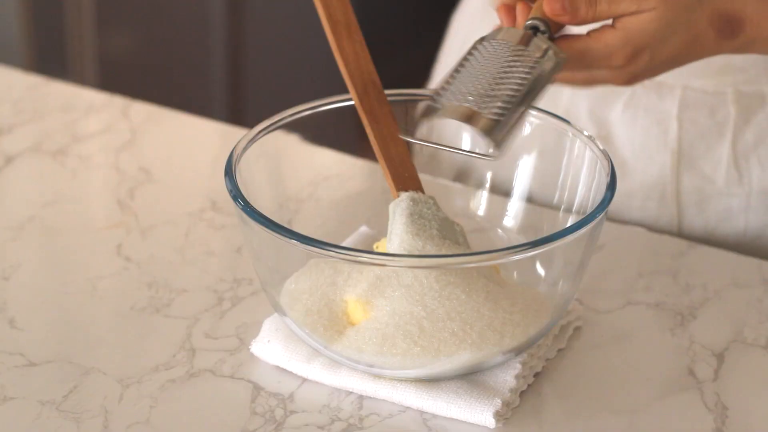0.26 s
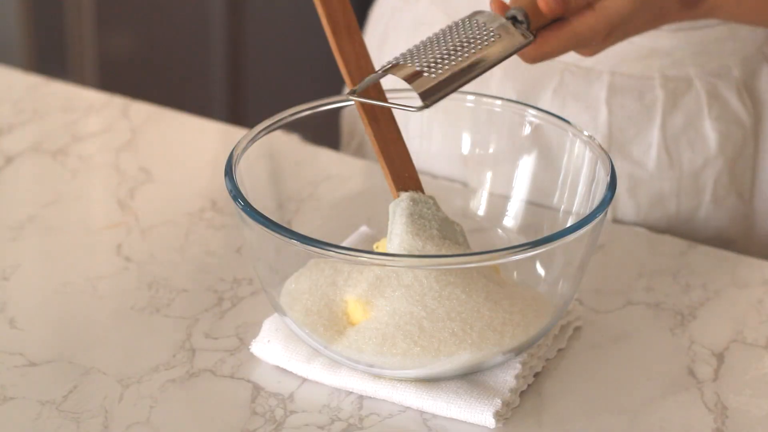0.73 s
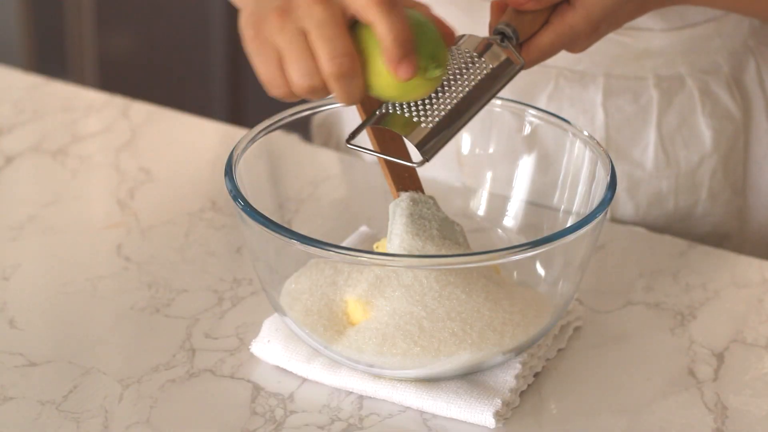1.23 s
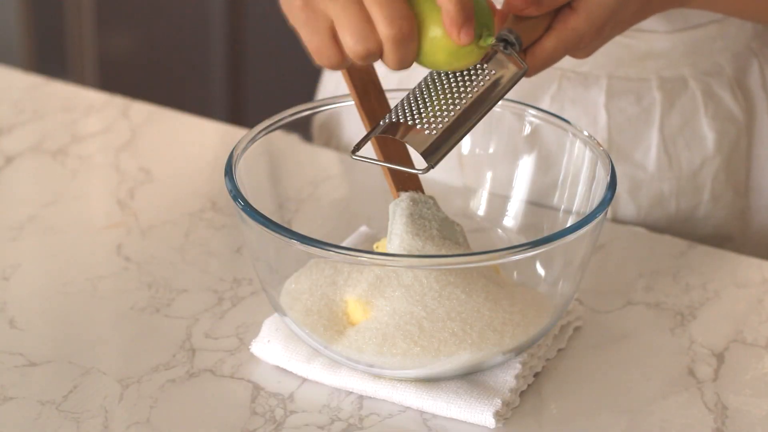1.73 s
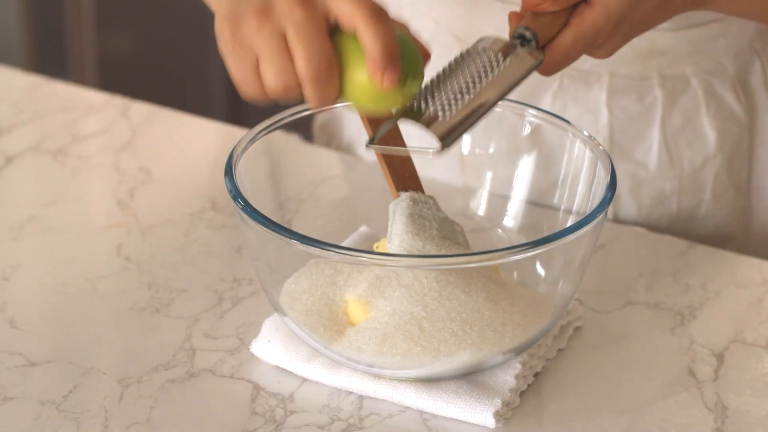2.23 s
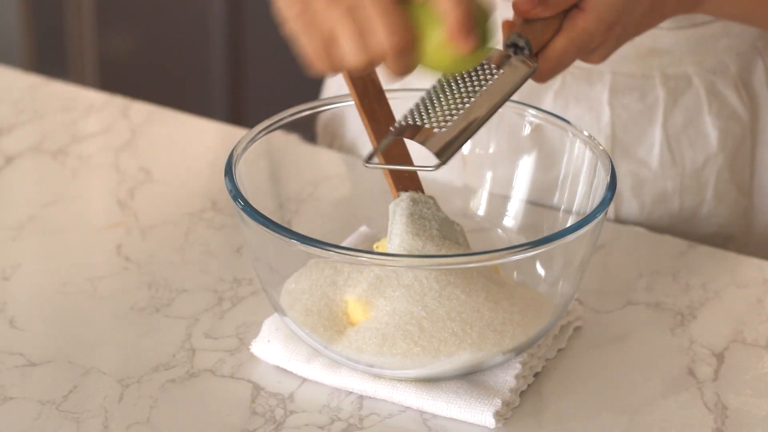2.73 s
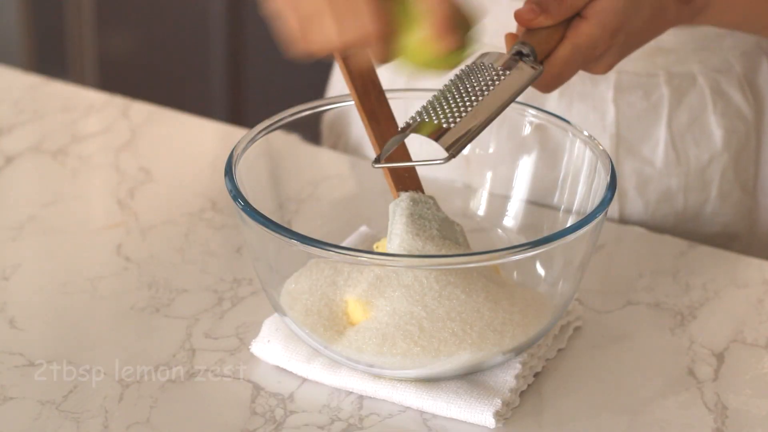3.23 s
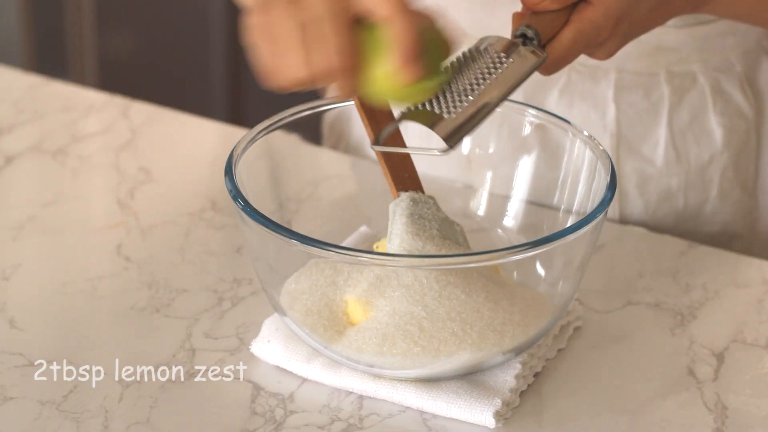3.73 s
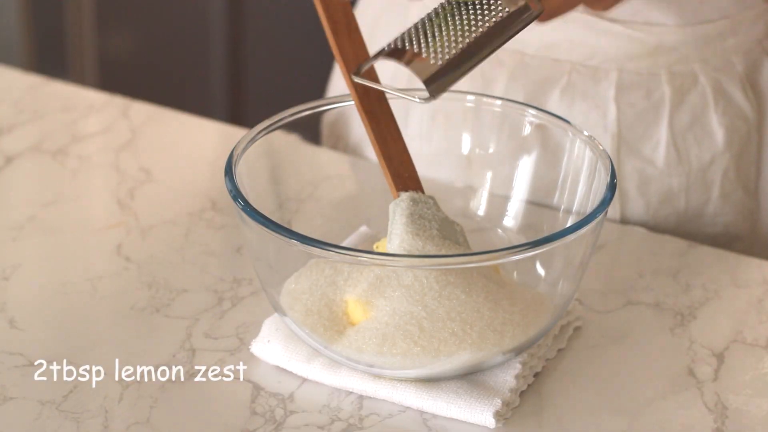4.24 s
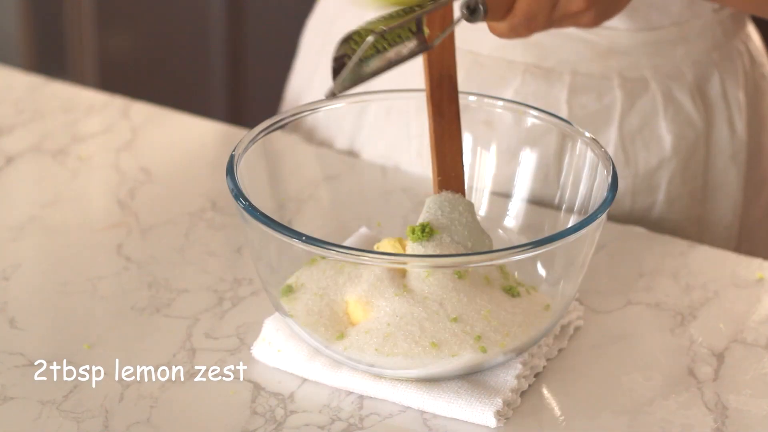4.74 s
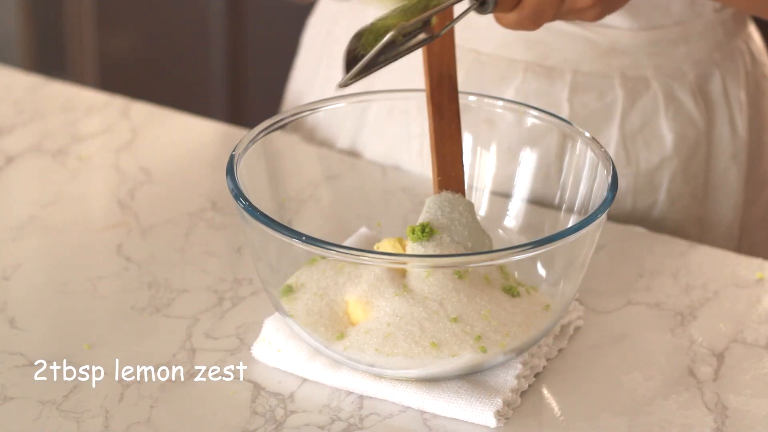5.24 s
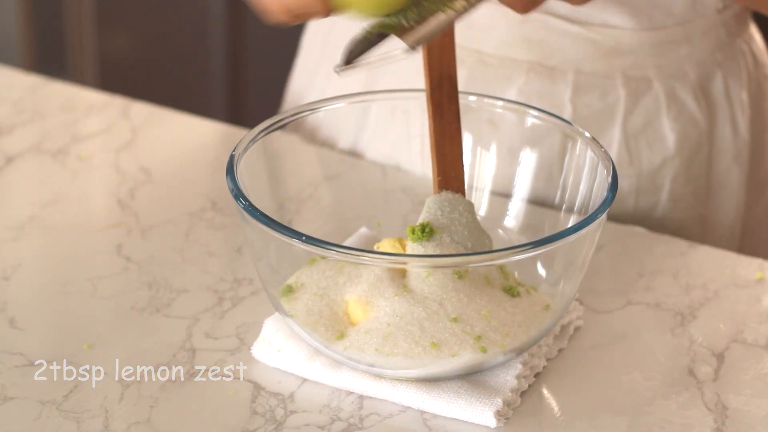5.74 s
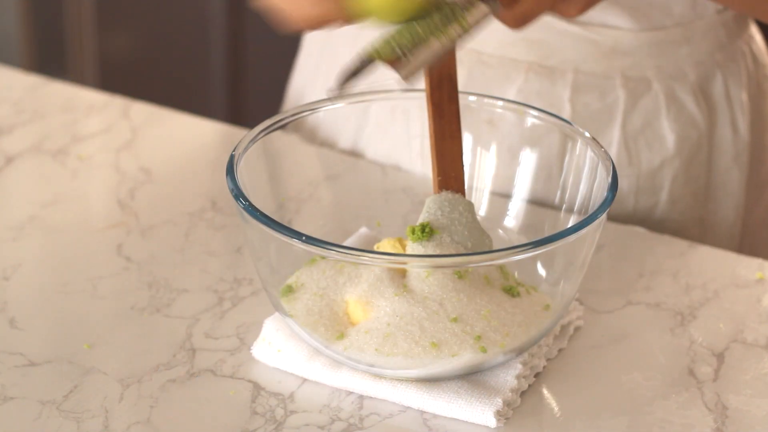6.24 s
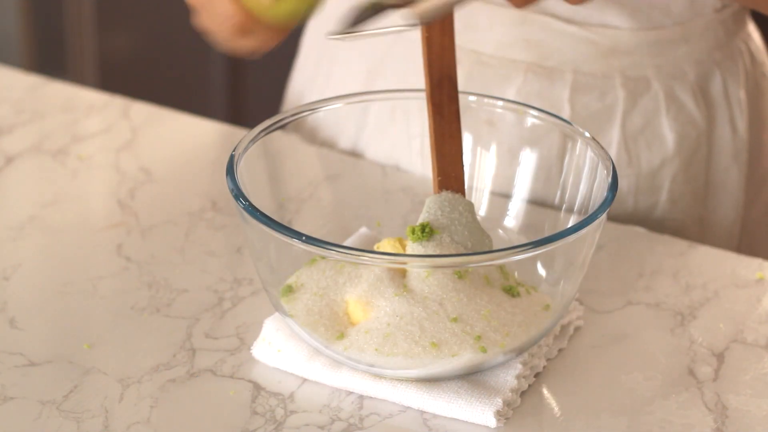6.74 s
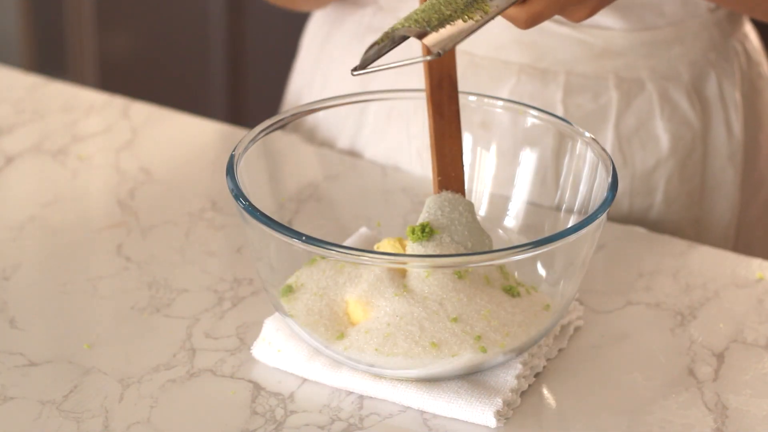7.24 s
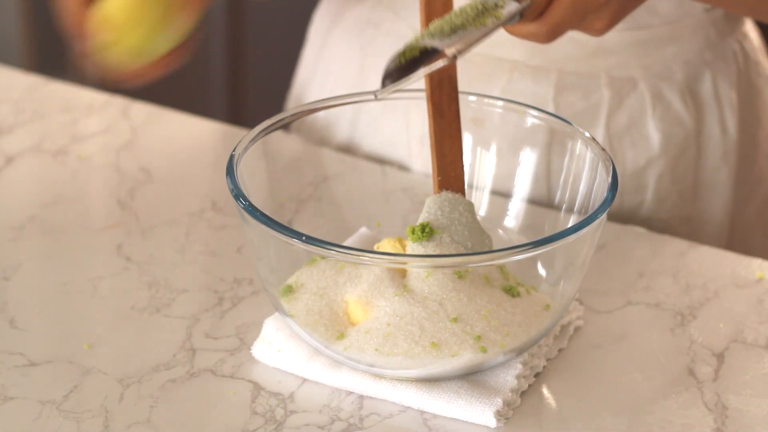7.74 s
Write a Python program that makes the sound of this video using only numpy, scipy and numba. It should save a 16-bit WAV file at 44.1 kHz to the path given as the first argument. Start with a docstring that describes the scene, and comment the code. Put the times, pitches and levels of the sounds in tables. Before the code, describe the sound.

Citrus peel rasps on a small steel hand grater, first in separate strokes with light taps, then in fast back-and-forth rubbing, over faint kitchen hum.

```python
"""In a small kitchen with a faint hum, a lemon is zested on a fine hand grater over a glass bowl.
Single downstrokes, the later ones each after a light tap of the fruit on the steel, give way to
quick back-and-forth rubbing heard from another angle. Teeth snapping through the peel are random clicks;
they hiss directly and set off gliding resonances of the steel sheet and the hollow grater.
Brushing, clinks, a small room, a slightly widened treble and kitchen air with hum complete the sound."""
import sys
import numpy as np
from scipy import signal
from scipy.fft import rfft, irfft, next_fast_len
from scipy.io import wavfile
from numba import njit

SR = 44100
rng = np.random.default_rng(int(sys.argv[2]) if len(sys.argv) > 2 else 0)


def transcribe(u):
    """Save the signal u as a 16-bit wav file named by the first command-line argument.

    u: samples, shape (n,) or (channels, n), limited to [-1, 1]; the rate is SR.
    q: integer samples, one column per channel.
    """
    v = np.clip(np.atleast_2d(u).T, -1, 1)
    q = np.round(v * 32767).astype(np.int16)
    wavfile.write(sys.argv[1], SR, q)


N = 351918
TIME = np.arange(N) / SR
PUSH, PULL = 1, -1  # stroke directions
TURN_S = 4.66  # when the listening angle changes

# colour of the tearing peel in quick rubbing: (frequency [Hz], relative level per hertz [dB])
QUICK_RASP = [(1000, -57), (2700, -5), (3400, -0.5), (4000, -0.5), (4700, 0), (5500, -1.5), (6300, 1),
              (7300, 2.5), (8800, -8.5), (10500, 1.5), (12000, -1), (13500, -2), (15500, -9)]


def single_strokes():
    """Separate downstrokes: each press drives the teeth through the peel once."""
    # the strokes; bite is how much harder than usual the teeth shake the steel:
    # (start [s], length [s], rasp level [dB], bite [dB])
    strokes = [(1.234, 0.14, -25, -13), (1.392, .15, -33.5, -6), (1.565, 0.13, -28, -7.5),
               (1.702, 0.17, -33, -6), (1.865, 0.16, -25, 0.5), (2.202, 0.15, -22, -1),
               (2.519, .146, -22.5, 1.5), (2.827, 0.14, -22, -1.5), (3.13, 0.14, -20, 3),
               (3.414, 0.15, -22.5, 3), (3.75, 0.16, -18, 2), (4.051, 0.15, -19.5, -0.5),
               (4.46, 0.13, -17, -5)]
    # colour of the tearing peel: (frequency [Hz], relative level per hertz [dB])
    rasp = [(1000, -35.5), (2900, -21.5), (3600, -13.5), (4700, -1.5), (5500, -0.5), (6300, -0.5),
            (7300, -4), (8800, -5), (10500, -5.5), (12000, -0.5), (13500, -5), (15500, -6)]
    # resonances of the steel sheet: (frequency [Hz], width [Hz], relative level [dB])
    sheet = [(1110, 35, -2.5), (1600, 50, -1), (1900, 100, 0), (2250, 200, -3.5), (3155, 220, 2),
             (3567, 570, -3)]
    # low resonances of the curved grater under the fruit: (frequency [Hz], width [Hz], relative level [dB])
    body = [(280, 88, -10), (399, 88, -3.5), (483, 98, 0.5), (650, 166, 4), (771, 253, -4.5)]
    downstrokes = [(*row, PUSH) for row in strokes]
    motion = stroking(downstrokes, rise=0.42, fall=0.49)
    force = tears(per_s=24000, spread_db=2.5, judder_db=1.14)
    return grating(motion, force, rasp, sheet, body, sheet_db=-13, body_db=-12.5, sheet_follows=0.78,
                   sheet_power=1.0, body_power=1.37, sag_octaves=0.12, flex_octaves=0)


def quick_strokes():
    """Rubbing to and fro flexes the sheet: its ring is higher on the push and lower on the pull."""
    # the strokes: (start [s], length [s], rasp level [dB], bite [dB], direction [push 1, pull -1])
    strokes = [(4.68, 0.12, -19, 2.5, PUSH), (4.803, 0.087, -20, 2.5, PULL), (4.918, 0.1, -21.5, 2.5, PUSH),
               (5.032, .105, -22, 1, PULL), (5.169, 0.094, -23.5, 1, PUSH),
               (5.326, 0.093, -23.5, 0.5, PULL), (5.471, 0.12, -20, -4, PUSH),
               (5.588, 0.12, -24, 1.5, PUSH), (5.708, .112, -21.5, 2.5, PULL),
               (5.824, 0.11, -25.5, 5, PUSH), (5.948, 0.11, -21.5, 0, PULL), (6.058, 0.11, -21.5, 0, PUSH),
               (6.176, 0.11, -21.5, -1, PULL), (6.29, 0.11, -21, -0.5, PUSH),
               (6.414, 0.11, -22.5, 0.5, PULL), (6.543, .117, -24, -1.5, PUSH),
               (6.661, 0.13, -23.5, -0.5, PULL)]
    # resonances of the steel sheet: (frequency [Hz], width [Hz], relative level [dB])
    sheet = [(990, 285, -9.5), (1568, 260, -2.5), (1668, 260, -1), (2430, 760, -6.5), (2705, 470, -6.5),
             (2797, 146, -3)]
    # low resonances of the curved grater under the fruit: (frequency [Hz], width [Hz], relative level [dB])
    body = [(192, 130, -16), (442.6, 120, -9), (501, 39.5, 1), (640, 68, 3), (801, 180, -5.5)]
    motion = stroking(strokes, rise=0.32, fall=0.39)
    force = tears(per_s=20000, spread_db=1.5, judder_db=1.03)
    # the rubbing starts hard and eases off, so the sheet rings less and less (1.7 dB each second)
    eased_db = 1.7 * np.maximum(TIME - TURN_S, 0)
    return grating(motion, force, QUICK_RASP, sheet, body, sheet_db=-8 - eased_db, body_db=-14.5,
                   sheet_follows=0.6, sheet_power=1.12, body_power=0.9, sag_octaves=0.062, flex_octaves=0.069)


def grating(motion, force, rasp, sheet, body, sheet_db, body_db, sheet_follows, sheet_power, body_power,
            sag_octaves, flex_octaves):
    """Tears hiss directly and shake sheet and body; a deep bite brings out the low body rings most."""
    pressure, rasp_db, bite_db, direction, travel = motion
    rasp_gain = from_db(rasp_db) * pressure
    # the powers set how sharply each ringing level follows the pressure
    sheet_gain = from_db(rasp_db + sheet_db + sheet_follows * bite_db) * pressure ** sheet_power
    body_gain = from_db(rasp_db + body_db + bite_db) * pressure ** body_power
    sheet_bend = flex_octaves * direction + 0.05 * drift(8)
    # the hollow note sags as the fruit travels along the blade
    body_bend = -sag_octaves * travel + 0.018 * drift(9.7)
    hiss = wandering(coloured(force, rasp), wander_db=1.63)
    sheet_ring = ringing(force, sheet, sheet_bend, damping_db=0.9, low_hz=830, high_hz=4000)
    body_ring = ringing(force, body, body_bend, damping_db=2.4, low_hz=175, high_hz=994)
    return rasp_gain * hiss + sheet_gain * sheet_ring + body_gain * body_ring


def stroking(strokes, rise, fall):
    """The hand's motion: pressure (0-1), rasp and bite (dB), direction, place along the blade (-.5 to .5)."""
    pressure, rasp_db, bite_db, direction, travel = np.zeros((5, N))
    for start, length, stroke_db, stroke_bite_db, way in strokes:
        # rise and fall are shares of the stroke's length
        press = swell(start, length, rise * length, fall * length)
        on = press > pressure  # where strokes overlap, the harder press wins
        pressure[on] = press[on]
        rasp_db[on], bite_db[on], direction[on] = stroke_db, stroke_bite_db, way
        travel[on] = (TIME[on] - start) / length - .5
    return pressure, rasp_db, bite_db, direction, travel


def tears(per_s, spread_db, judder_db):
    """Teeth snap through peel cells: clicks of uneven size, their strength juddering as rows of teeth bite."""
    unevenness = np.minimum(rng.exponential(1, N), 4)
    sizes = from_db(spread_db * unevenness) * rng.choice([-1, 1], N)
    happens = rng.random(N) < per_s / SR
    return rms_one(sizes * happens * from_db(judder_db * drift(260)))


def wandering(x, wander_db):
    """The contact moves over the sheet, so each part of the treble comes and goes; rms 1."""
    size = next_fast_len(N)
    spectrum, hz = rfft(x, size), np.arange(size // 2 + 1) * SR / size
    centres = np.geomspace(2500, 16000, 12)
    total = 0
    for share in np.eye(len(centres)):
        # overlapping triangular slices that add up to the whole sound
        part = irfft(spectrum * np.interp(hz, centres, share), size)[:N]
        total = total + from_db(wander_db * drift(22)) * part
    return rms_one(total)


def ringing(force, modes, bend, damping_db, low_hz, high_hz):
    """The sliding fruit bends each resonance (octaves) and damps it by a changing amount; rms 1."""
    turn_per_hz = 2 * np.pi / SR * 2 ** bend
    rings = 0
    for k, (hz, width_hz, level_db) in enumerate(modes):
        gain = (-1) ** k * from_db(level_db + damping_db * drift(14))  # neighbours have opposite signs
        rings = rings + gain * gliding(force, hz * turn_per_hz, np.exp(-np.pi * width_hz / SR))
    return rms_one(band(rings, low_hz, high_hz))


@njit
def gliding(x, turn, r):
    """A resonance whose centre (radians a sample) moves; r is what remains of its ring after one sample."""
    out, state = np.zeros(len(x)), 0j
    for i in range(1, len(x)):
        state = state * r * complex(np.cos(turn[i]), np.sin(turn[i])) + x[i]
        out[i] = 2 * (1 - r) * state.real
    return out


def quick_contact():
    """Light sliding and the odd bright snag of a tooth around the quick strokes."""
    # the fruit keeps sliding lightly on the teeth: (start [s], length [s], level [dB])
    slides = [(4.652, .62, -37.5), (5.353, 1.41, -38.5)]
    # a tooth catches and lets go: (time [s], relative level [dB])
    snags = [(4.708, -10), (4.7105, -12), (5.381, -18), (5.44, -17.5), (5.453, -35), (5.468, -15)]
    touch = sum(from_db(db) * swell(s, length, 0.012, 0.026) for s, length, db in slides)
    slide = touch * coloured(tears(per_s=2700, spread_db=5.0, judder_db=1.5), QUICK_RASP)
    return slide + band(bursts(snags, decay_s=0.0049), 5600, 17000) * from_db(3)


def taps(level_db):
    """Soft peel meets steel: a short crunch sets off heavily damped resonances."""
    # the fruit knocks on the steel: (time [s], relative level [dB])
    knocks = [(2.174, -24), (2.502, -18.5), (2.506, -26), (2.798, -21), (3.099, -21.5), (3.39, -25.5),
              (3.704, -21), (4.018, -28), (4.329, -22.5)]
    # what a knock rings with: (frequency [Hz], width [Hz], relative level [dB])
    modes = [(663, 95, 4.5), (1750, 249, -9), (2587, 440, -1), (4520, 770, -1.5), (6340, 1600, -6.5),
             (7800, 900, -10.5), (10500, 1700, -6)]
    force = bursts(knocks, decay_s=.0014)
    return from_db(level_db) * sum(from_db(db) * resonate(force, hz, width_hz) for hz, width_hz, db in modes)


def handling():
    """Fingers and fruit brush the grater as broad noise; steel clinks or squeaks in the hand as narrow noise."""
    # brushes of fingers and fruit: (start [s], length [s], centre frequency [Hz], relative level [dB])
    brushes = [(0.197, 0.33, 2200, -58.5), (0.603, 0.33, 7000, -61.5), (1.222, 0.05, 5800, -56),
               (4.383, 0.058, 6740, -34), (7.636, 0.3, 2500, -68)]
    # clinks and squeaks of the steel: (start [s], length [s], centre frequency [Hz], relative level [dB])
    clinks = [(0.573, 0.014, 5800, -52), (0.762, 0.087, 3260, -53.5), (7.912, 0.008, 4250, -50)]
    return touching(brushes, width=1) + touching(clinks, width=0.18)


def touching(touches, width):
    """Swells of noise through two equal resonances; width is a share of the centre frequency."""
    noise = rng.standard_normal(N)
    total = 0
    for s, length, hz, db in touches:
        tone = rms_one(resonate(resonate(noise, hz, width * hz), hz, width * hz))
        total = total + from_db(db) * swell(s, length, length * 0.195, length) * tone
    return total


def kitchen(x, level_db, bass_db):
    """Direct sound plus the room, whose echo pattern changes as the hands move."""
    place = 2 * drift(4)
    # the sound wanders between two different echo patterns
    wet = sum(signal.fftconvolve(x * share, room_tail(bass_db))[:N] for share in (np.cos(place), np.sin(place)))
    return x + from_db(level_db) * wet


def room_tail(bass_db):
    """Diffuse echoes that die band by band; energy 1."""
    # kitchen reverberation: (frequency [Hz], time to fall by 60 dB [s])
    room_t60 = [(300, 0.46), (1500, 0.25), (4500, 0.35), (9000, 0.23), (15000, 0.094)]
    age, tail = np.arange(SR // 2) / SR, 0
    edges = np.geomspace(150, 19200, 8)
    for low, high in zip(edges, edges[1:]):
        hz = np.sqrt(low * high)
        lift_db = bass_db / (1 + (hz / 2500) ** 2)
        decay_db = lift_db - 60 * age / at_hz(room_t60, hz)
        tail = tail + band(rng.standard_normal(len(age)), low, high) * from_db(decay_db)
    tail = tail * np.clip(age / 0.0044, 0, 1)  # the echoes build up over the first 4.4 ms
    return tail / np.linalg.norm(tail)


def two_ports(x, lag_s, scatter_db):
    """A faint bright scatter, added left and subtracted right, widens the sound; the right port lags."""
    side = from_db(scatter_db) * scattered(x, decay_s=.015, above_hz=1200)
    size = next_fast_len(N)
    delay = np.exp(-2j * np.pi * np.arange(size // 2 + 1) * SR / size * lag_s)
    right = irfft(rfft(x - side, size) * delay, size)[:N]
    return np.array([x + side, right])


def scattered(x, decay_s, above_hz):
    """A short random cluster of bright echoes that widens the treble."""
    age = np.arange(SR // 20) / SR
    echoes = rng.standard_normal(len(age)) * np.exp(-age / decay_s) * (age > .001)
    echoes = echoes / np.linalg.norm(echoes)
    echoes = signal.sosfilt(signal.butter(1, above_hz, "high", fs=SR, output="sos"), echoes)
    return signal.fftconvolve(x, echoes)[:N]


def first_background():
    """Kitchen air and appliance hum from the first angle."""
    # colour of the air: (frequency [Hz], relative level per hertz [dB])
    air = [(20, -5.5), (32, -21), (60, -17), (120, -17.5), (350, -25), (600, -31.5), (740, -26.5),
           (900, -32.5), (1090, -29), (1300, -36), (3500, -46.5), (15500, -53)]
    # appliance hum: (frequency [Hz], relative level [dB], waver [dB])
    hum = [(96.5, -56, 3), (193.7, -65.5, 8.5)]
    return background(air, -47, hum)


def second_background():
    """Kitchen air and appliance hum from the second angle."""
    # colour of the air: (frequency [Hz], relative level per hertz [dB])
    air = [(20, -9), (45, 1), (135, -0.5), (190, -6.5), (350, -7.5), (550, -14.5), (730, -12), (900, -16.5),
           (1100, -15.5), (1600, -22.5), (3500, -31), (8000, -33), (15500, -37.5)]
    # appliance hum: (frequency [Hz], relative level [dB], waver [dB])
    hum = [(88, -52.5, 2.2)]
    return background(air, -52.5, hum)


def background(air, air_db, hum):
    """Room air is coloured noise; the hum is sine tones wavering in loudness and phase."""
    tones = 0
    for hz, db, waver_db in hum:
        wobble = 0.093 * waver_db * drift(6.7)  # radians
        tone = from_db(waver_db * drift(9)) * np.sin(2 * np.pi * hz * TIME + wobble)
        tones = tones + np.sqrt(2) * from_db(db) * rms_one(tone)
    return from_db(air_db) * coloured(rng.standard_normal(N), air) + tones


def from_db(db):
    """Decibels to gain."""
    return 10 ** (np.asarray(db) / 20)


def rms_one(x):
    """Scale to unit rms (average strength)."""
    return x / np.sqrt(np.mean(x ** 2) + 1e-20)


def at_hz(points, hz):
    """Read a table along log frequency."""
    known_hz, values = np.transpose(points)
    return np.interp(np.log(hz + 1), np.log(known_hz), values)


def coloured(x, spectrum):
    """Give a signal a smooth spectrum; rms 1."""
    size = next_fast_len(N)
    gain = from_db(at_hz(spectrum, np.arange(size // 2 + 1) * SR / size))
    return rms_one(irfft(rfft(x, size) * gain, size)[..., :N])


def drift(rate):
    """Random wandering of rms 1: straight lines between random points, rate of them a second."""
    knots = rng.standard_normal(N // 20)
    return rms_one(np.interp(TIME * rate, np.arange(len(knots)), knots))


def resonate(x, hz, width_hz):
    """One resonance, gain 1 at its top."""
    r = np.exp(-np.pi * width_hz / SR)
    top = np.array([1, 0, -1]) * (1 - r * r) / 2
    return signal.lfilter(top, [1, -2 * r * np.cos(2 * np.pi * hz / SR), r * r], x + 1e-18)


def band(x, low_hz, high_hz):
    """Band-pass with steep sides."""
    edges_hz = [low_hz, min(high_hz, .48 * SR)]
    return signal.sosfilt(signal.butter(3, edges_hz, "band", fs=SR, output="sos"), x)


def swell(start, length, rise, fall):
    """Smooth rise, hold and fall between 0 and 1; all settings in seconds."""
    def edge(u):
        return np.sin(np.pi / 2 * np.clip(u, 0, 1)) ** 2
    out, on = np.zeros(N), slice(int(start * SR), int((start + length) * SR))
    out[on] = edge((TIME[on] - start) / rise) * edge((start + length - TIME[on]) / fall)
    return out


def bursts(rows, decay_s):
    """A brief dying crunch of noise for every (time, level) row."""
    out, age = np.zeros(N), np.arange(SR // 50) / SR
    for s, level_db in rows:
        crunch = rng.standard_normal(len(age)) * np.exp(-age / decay_s)
        out[int(s * SR):int(s * SR) + len(age)] += from_db(level_db) * crunch
    return out


def scene():
    """Single strokes from one angle, then quick rubbing from the other; handling keeps the first angle."""
    # how late the right port hears from the first and the second angle: (lag [s], lag [s])
    port_lag_s = (1.35 / SR, 2.55 / SR)
    single = kitchen(single_strokes() + taps(level_db=7) + handling(), level_db=-11, bass_db=-2.0)
    quick = kitchen(quick_strokes() + quick_contact(), level_db=-11, bass_db=0)
    turned = np.clip((TIME - TURN_S) / 0.022, 0, 1)  # one background fades into the other
    first = single + (1 - turned) * first_background()
    second = quick + turned * second_background()
    return two_ports(first, port_lag_s[0], scatter_db=-20) + two_ports(second, port_lag_s[1], scatter_db=-17)


def record(dry):
    """The top is cut above 16 kHz and the converter sits slightly off zero."""
    offset = .023
    return offset + signal.sosfilt(signal.ellip(12, .1, 80, 16000, fs=SR, output="sos"), dry)


dry = scene()
out = record(dry)
transcribe(out)
```